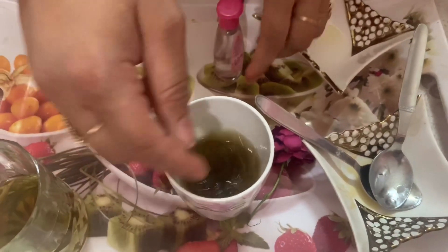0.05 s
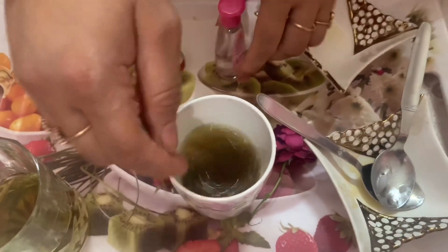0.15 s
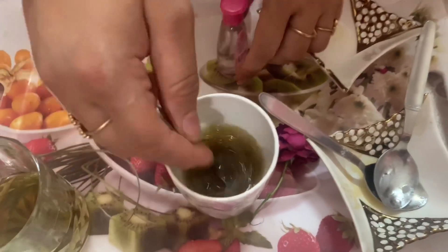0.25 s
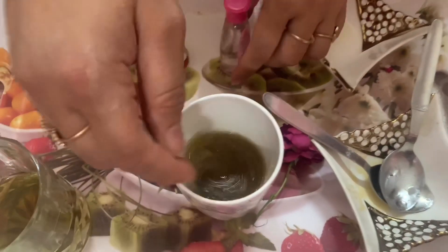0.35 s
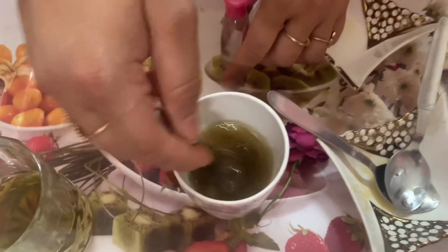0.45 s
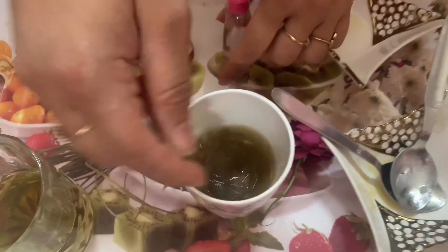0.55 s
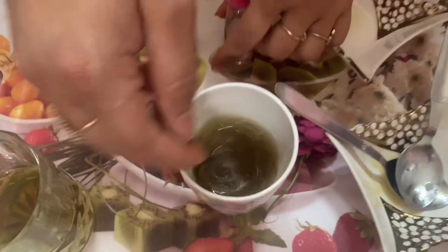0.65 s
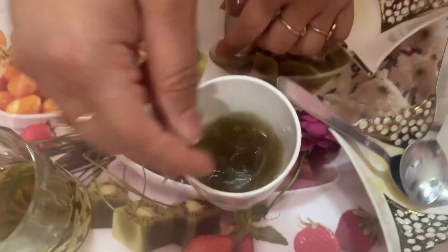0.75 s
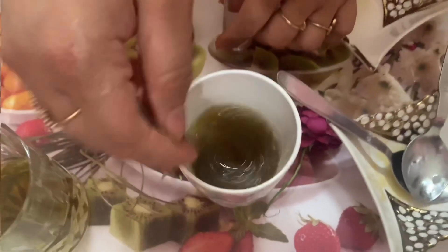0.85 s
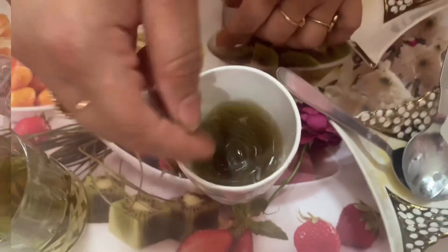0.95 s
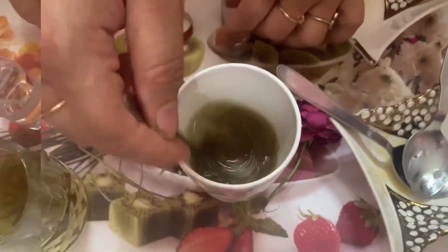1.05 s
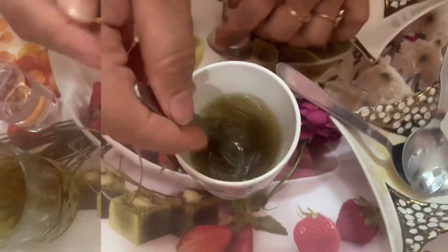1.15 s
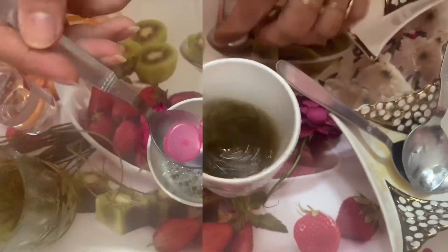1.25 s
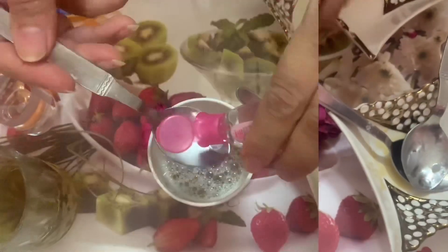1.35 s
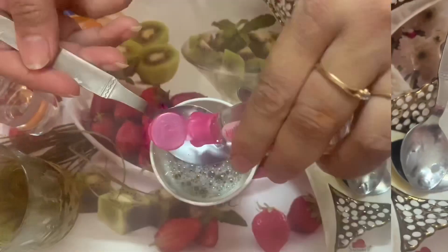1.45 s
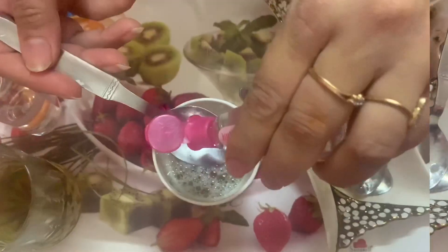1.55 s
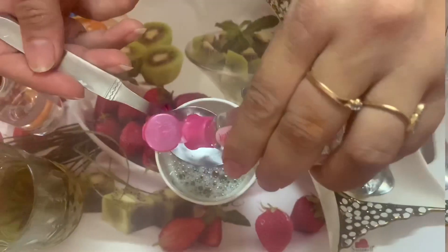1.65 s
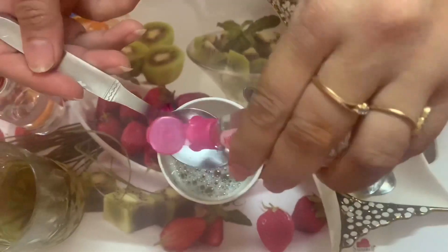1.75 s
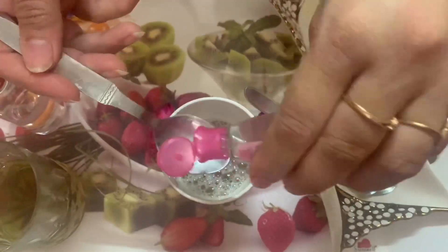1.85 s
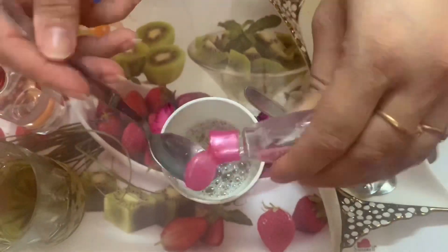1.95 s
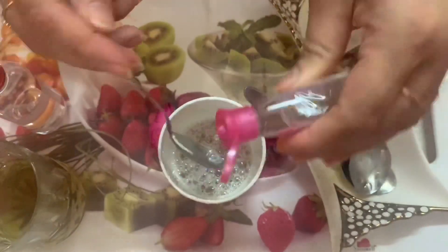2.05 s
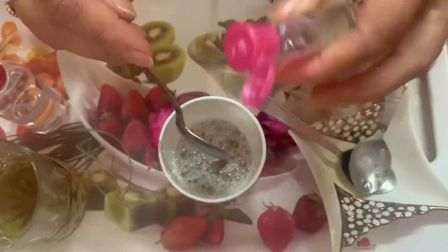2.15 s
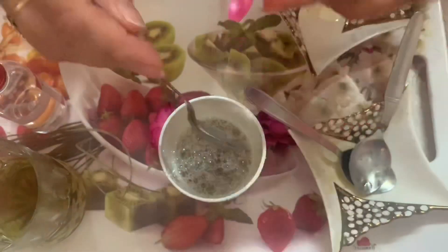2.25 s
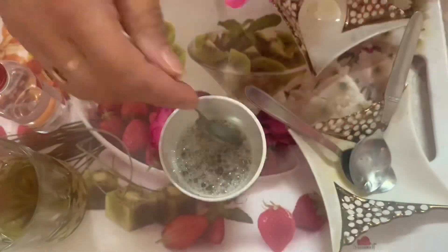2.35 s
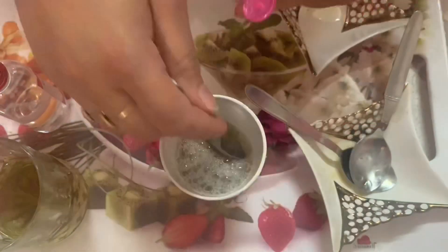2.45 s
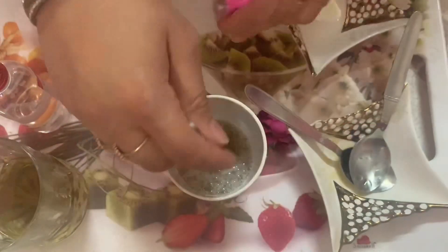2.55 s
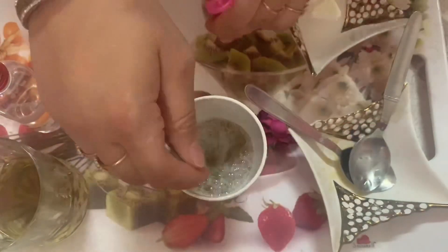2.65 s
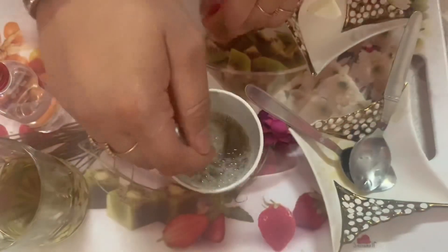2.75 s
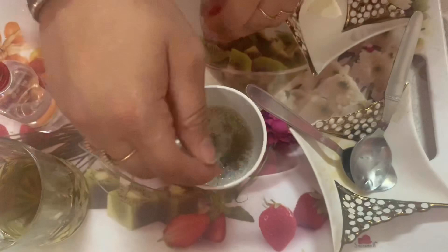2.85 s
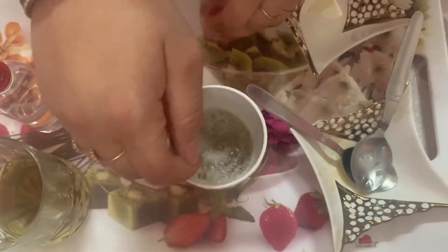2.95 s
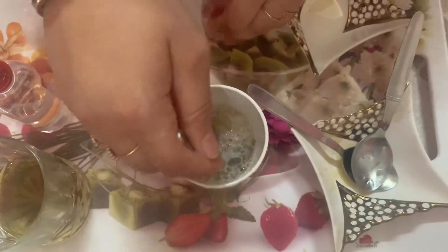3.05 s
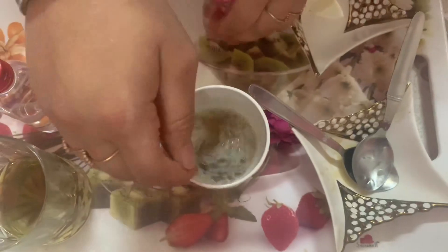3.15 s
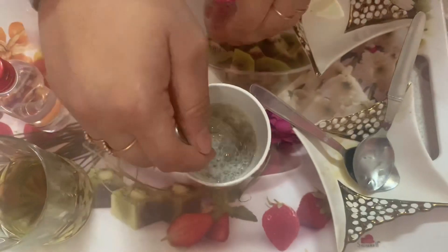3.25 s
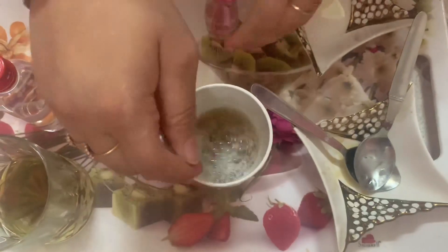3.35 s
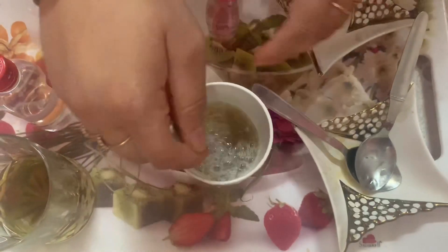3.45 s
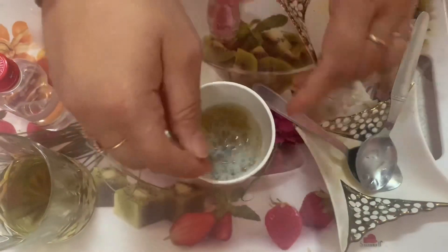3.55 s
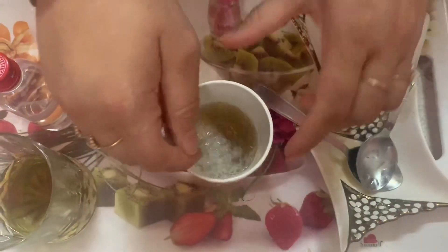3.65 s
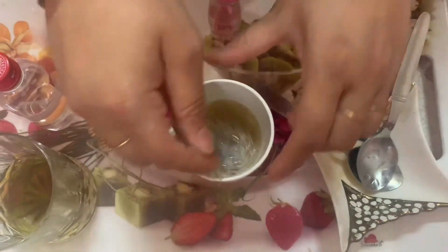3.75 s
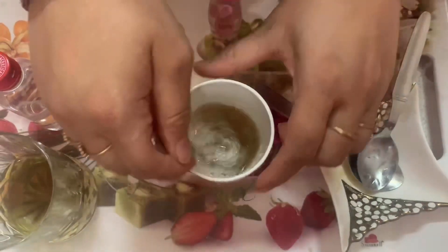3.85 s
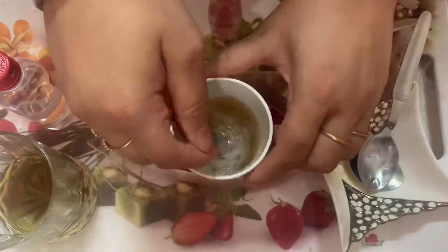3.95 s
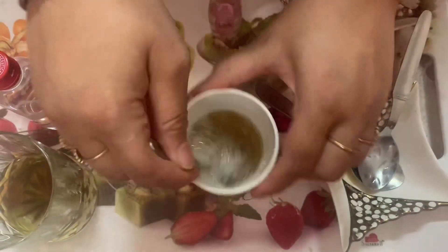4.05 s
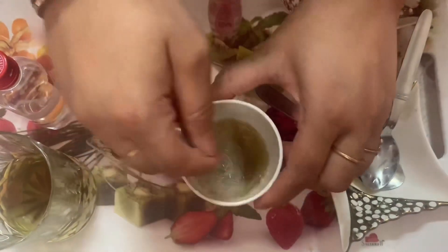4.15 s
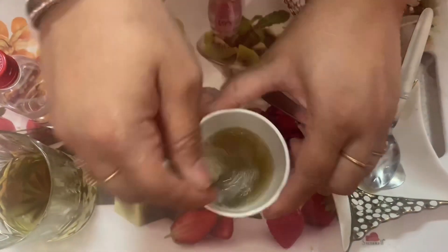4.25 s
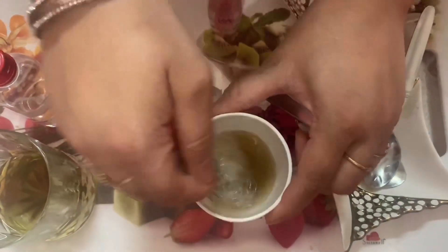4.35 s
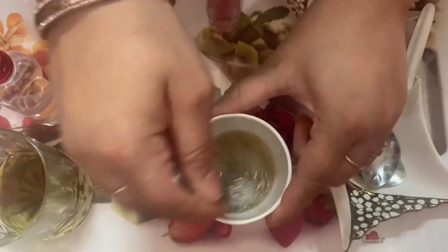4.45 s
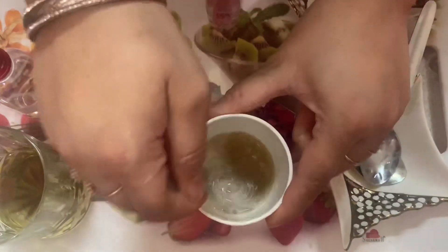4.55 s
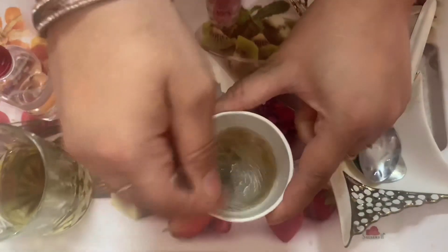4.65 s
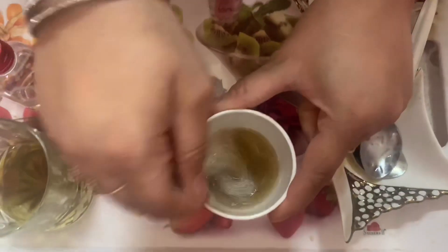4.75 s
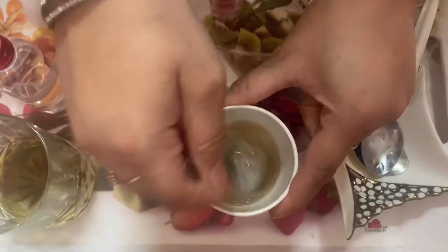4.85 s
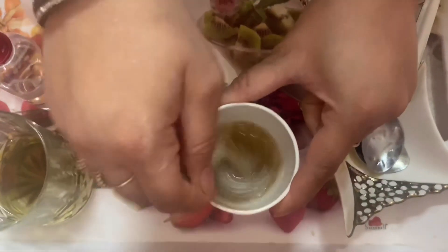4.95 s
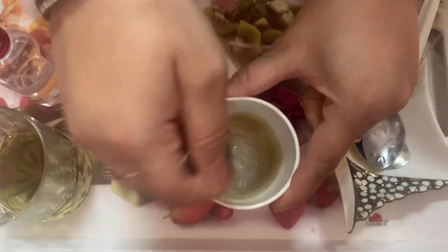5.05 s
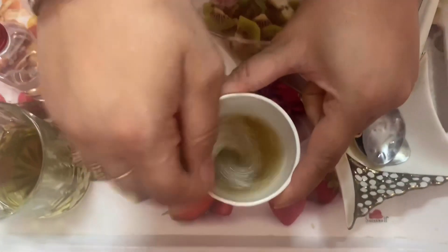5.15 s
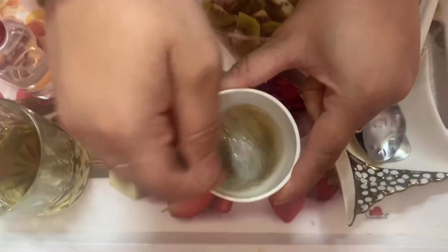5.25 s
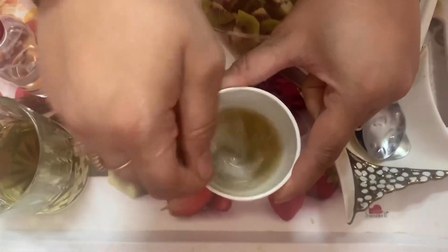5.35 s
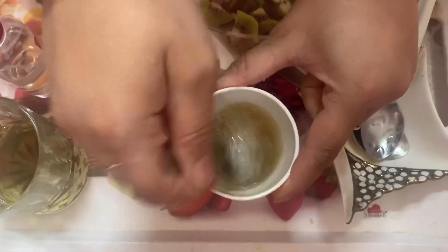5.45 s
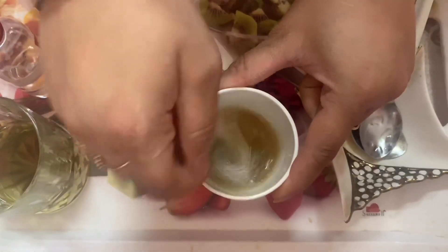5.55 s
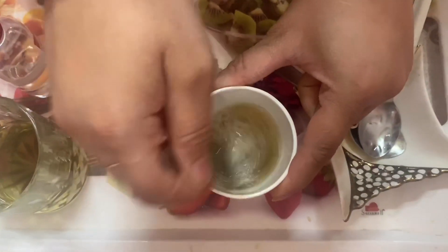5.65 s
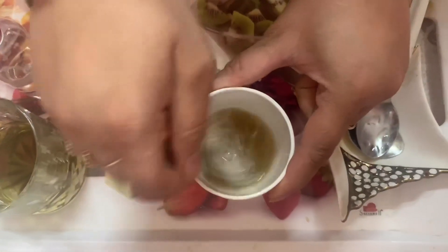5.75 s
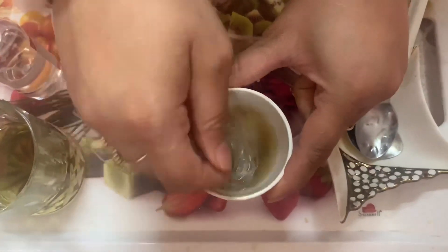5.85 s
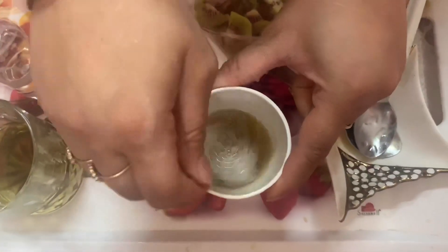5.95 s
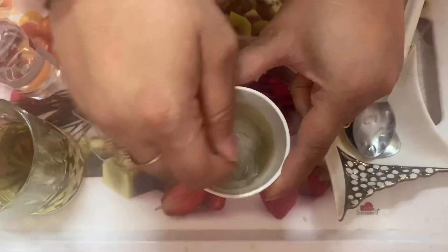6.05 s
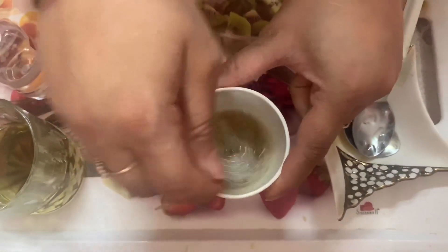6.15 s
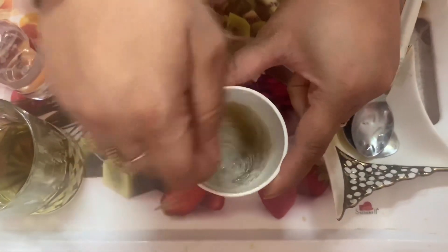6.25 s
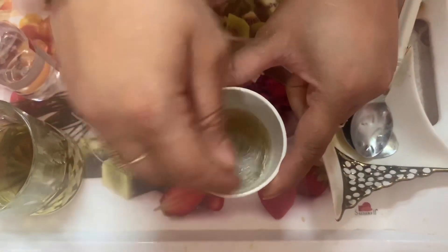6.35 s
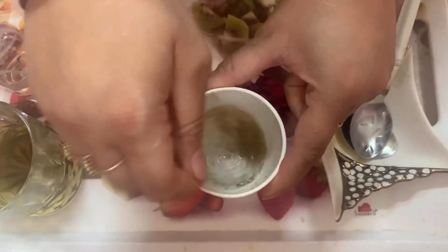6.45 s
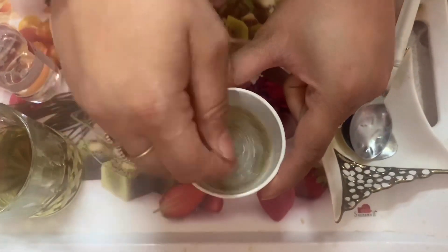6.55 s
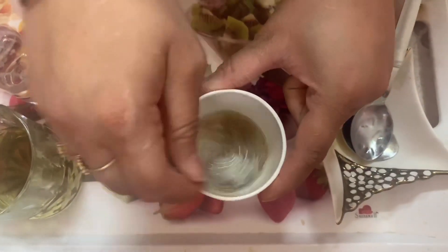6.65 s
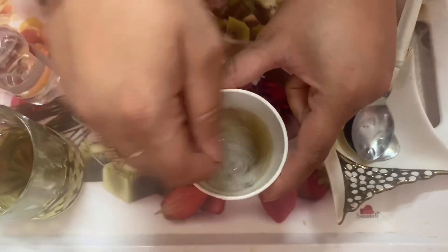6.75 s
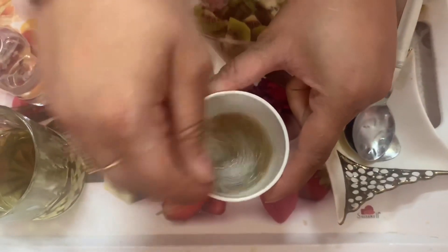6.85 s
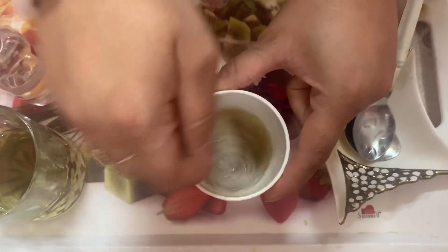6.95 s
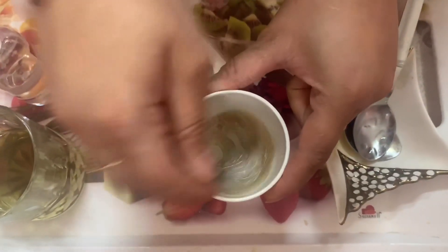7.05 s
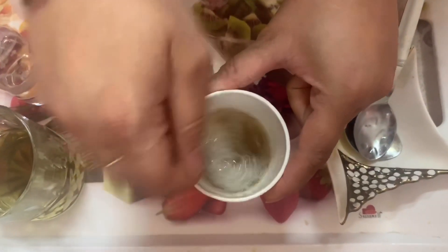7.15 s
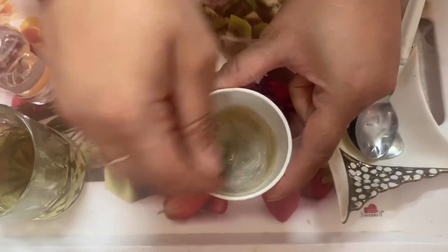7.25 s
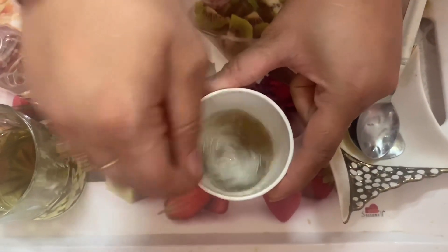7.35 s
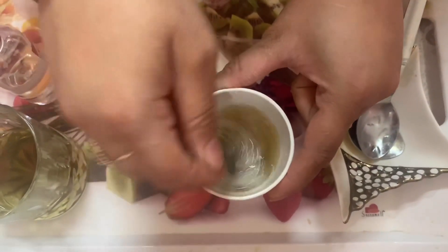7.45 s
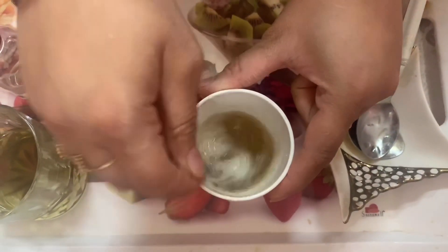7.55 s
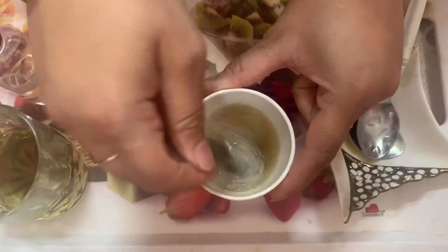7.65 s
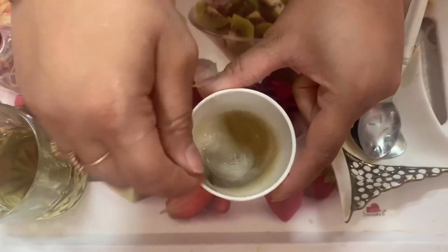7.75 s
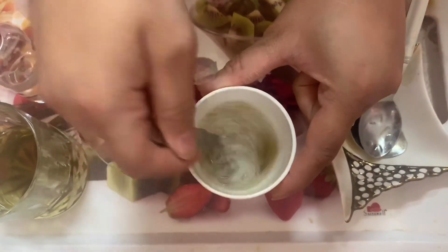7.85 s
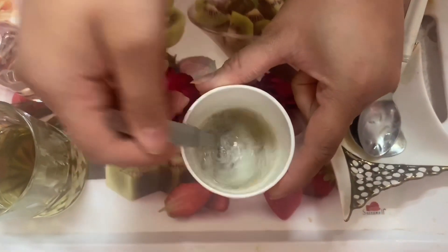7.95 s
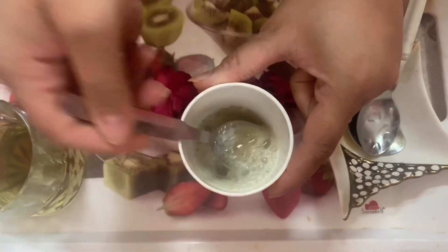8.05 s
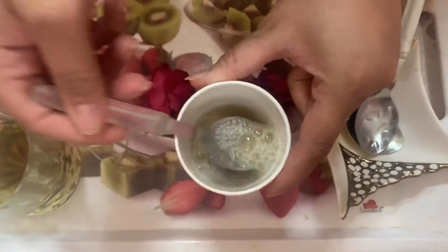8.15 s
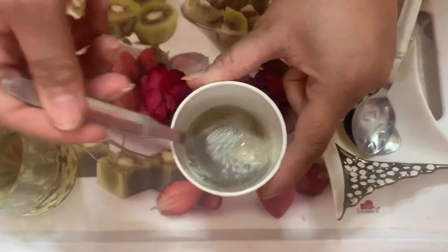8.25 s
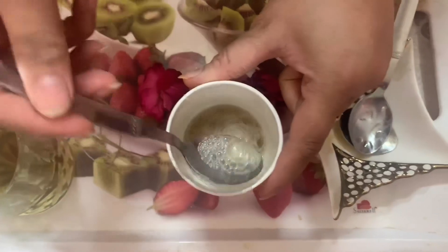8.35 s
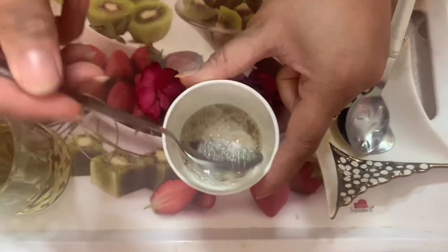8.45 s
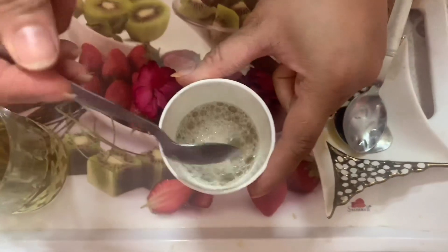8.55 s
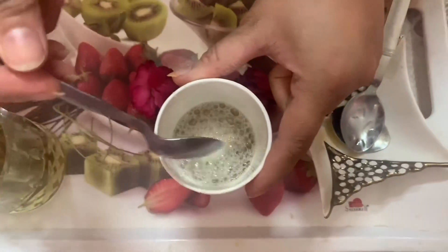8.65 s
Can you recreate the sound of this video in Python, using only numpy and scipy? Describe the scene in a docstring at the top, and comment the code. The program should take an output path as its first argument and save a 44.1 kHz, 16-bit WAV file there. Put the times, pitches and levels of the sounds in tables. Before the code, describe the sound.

A spoon rattles quickly around a small cup of liquid, ticking against ceramic with hollow knocks, tiny bubbly chirps and gritty scrapes. It stops for under a second, then starts again, first ringing, then drier and more clattery because the cup is held. Low thuds come from the tray beneath. Very close pickup, small quiet indoor room with short reflections.

```python
"""A metal spoon stirs liquid briskly in a small ceramic cup on a tray, close to a pair of microphones.
Each contact is a noisy tick and clack, a falling knock of the air in the cup and a burst of ringing modes.
In between, random jolts through warbling resonances scrape; short gliding sines are bubbles and spoon judder.
The tray thuds and booms under the cup. The stirring pauses and goes on; then a hand steadies the cup
and damps its ring. Near, early and diffuse reflections and a quiet room surround it all."""
import sys
import numpy as np
from scipy import signal
from scipy.fft import rfft, irfft, next_fast_len
from scipy.io import wavfile
from scipy.ndimage import uniform_filter1d

SR = 44100
rng = np.random.default_rng(int(sys.argv[2]) if len(sys.argv) > 2 else 0)


def inscribe(sig):
    """Save sig as 16-bit PCM at rate SR to the path in sys.argv[1].

    A 1-D sig is mono; a 2-D sig holds one channel per row.
    Samples are clipped to [-1, 1] before scaling.
    """
    pcm = np.round(np.clip(np.atleast_2d(sig).T, -1, 1) * 32767)
    wavfile.write(sys.argv[1], SR, pcm.astype(np.int16))


N = 383669

# Levels in the tables are settings relative to the layer's trim in the function that plays them.
# spoon meets cup, about twice a turn, at times in a quick cluster:
# [t/s, nominal cup air f/Hz, air knock level/dB, clack f/Hz, wall clack level/dB, metal tick level/dB]
CONTACTS = [(0.0312, 1280, -24.5, 2730, -20.5, -28.5), (0.0847, 1590, -43, 3025, -22, -24),
            (0.1837, 1337, -14.5, 2200, -25, -15), (0.272, 1500, -26.5, 2410, -30, -35.5),
            (0.3102, 1310, -24.5, 3260, -22.5, -22), (0.3255, 1320, -32, 2590, -21.5, -25),
            (0.4205, 1410, -21.5, 2880, -28.5, -16.5), (0.43, 1730, -31.5, 2896, -17, -29),
            (0.51, 1385, -22, 3140, -21, -30.5), (0.556, 1550, -32, 2500, -20, -22.5),
            (0.612, 1430, -28.5, 3060, -29, -46), (0.657, 1374, -11, 2180, -36.5, -18.5),
            (0.7385, 1364, -25, 2950, -21.5, -35), (0.7805, 1330, -20, 3130, -13, -16),
            (0.8803, 1340, -18.5, 3370, -26.5, -26), (0.8941, 1620, -24.5, 3060, -19.5, -21),
            (1.0091, 1337, -19, 2615, -16, -16), (1.1093, 1330, -23.5, 2070, -21, -21),
            (1.2308, 1730, -27.5, 2580, -20.5, -18), (1.285, 1750, -42, 2900, -35.5, -33),
            (1.334, 1140, -30, 3020, -26, -22.5), (1.351, 1320, -31, 2980, -22, -39),
            (1.3633, 1300, -28, 2560, -29, -31.5), (1.396, 1365, -31.5, 2590, -26, -44),
            (1.464, 1460, -56, 3060, -28.5, -36.5), (1.54, 1340, -52, 2720, -51, -34.5),
            (1.5726, 1516, -27, 3250, -31.5, -31.5), (1.6076, 1883, -25.5, 1880, -37.5, -31),
            (1.633, 1500, -44, 2980, -39, -33.5), (1.718, 1276, -40, 1880, -43, -35.5),
            (1.737, 1280, -34.5, 1920, -41, -42), (2.5092, 1720, -49, 3130, -41, -32),
            (2.654, 1430, -16.5, 3560, -15.5, -29.5), (2.8025, 1320, -18, 2520, -22, -19),
            (2.8232, 1570, -36.5, 3050, -22, -19.5), (2.834, 1690, -27, 2900, -20, -26),
            (2.896, 1210, -31.5, 2990, -28, -34), (2.9262, 1310, -21.5, 2900, -35, -27),
            (3.0539, 1360, -15, 3550, -25, -25), (3.0808, 1380, -26, 3070, -30.5, -26.5),
            (3.1727, 1270, -24.5, 2940, -15, -13.5), (3.268, 1270, -23.5, 3330, -26, -24.5),
            (3.303, 1200, -27.5, 3110, -34, -43.5), (3.409, 1360, -15, 2980, -12, -17.5),
            (3.428, 1330, -19.5, 3060, -24.5, -27.5), (3.44, 1430, -17.5, 3060, -41.5, -31.5),
            (3.4982, 1480, -18, 3600, -25, -23.5), (3.6332, 1500, -22, 3034, -13.5, -16),
            (3.752, 1220, -21.5, 2050, -29.5, -32), (3.8546, 1473, -16, 1960, -13, -18),
            (3.905, 1360, -28, 2030, -45, -55.5), (3.9561, 1267, -22.5, 3600, -22.5, -25.5),
            (3.98, 1220, -24.5, 2220, -38, -39), (4.062, 1280, -47, 3100, -33, -43),
            (4.0939, 1380, -23.5, 2600, -19, -20.5), (4.1786, 1233, -16.5, 3430, -29.5, -24),
            (4.218, 1326, -23.5, 4070, -43, -43), (4.2847, 1520, -36, 3230, -23, -35),
            (4.4, 1350, -32, 2910, -21.5, -26), (4.4146, 1370, -27.5, 1910, -45, -27.5),
            (4.506, 1420, -27.5, 2860, -46, -39.5), (4.546, 1190, -28.5, 3380, -26.5, -35.5),
            (4.643, 1355, -22, 3430, -17.5, -23), (4.762, 1360, -29.5, 3390, -20, -33),
            (4.7708, 1194, -26.5, 3420, -20, -23), (4.8554, 1460, -27.5, 3190, -24.5, -27.5),
            (4.8654, 1517, -16.5, 3320, -27, -26), (4.974, 1405, -21, 2100, -28.5, -33.5),
            (4.9814, 1225, -21.5, 3170, -20, -25), (5.0526, 1230, -15.5, 2130, -14.5, -23.5),
            (5.1005, 1540, -13, 2300, -28, -18.5), (5.1129, 1200, -17.5, 2100, -32.5, -29.5),
            (5.1913, 1460, -37, 1940, -21, -14.5), (5.265, 1630, -17.5, 2560, -16.5, -23.5),
            (5.2848, 1300, -11.5, 3100, -29, -27), (5.3865, 1200, -24.5, 3110, -15, -19),
            (5.403, 1330, -33, 3200, -15, -23), (5.4495, 1225, -13.5, 3920, -16, -23),
            (5.486, 1444, -15, 2600, -12.5, -17), (5.4959, 1430, -22, 3100, -25, -31),
            (5.5733, 1170, -22, 2280, -20, -15), (5.641, 1120, -12.5, 2210, -20, -25),
            (5.6685, 1250, -17, 2390, -16, -19.5), (5.6772, 1480, -17, 3000, -25, -26),
            (5.7607, 1250, -26, 2950, -16.5, -28), (5.7671, 1210, -20.5, 3060, -19, -20),
            (5.8644, 1350, -15.5, 3040, -15, -27), (5.87, 1294, -16.5, 3170, -36, -21.5),
            (5.939, 1320, -23, 1900, -17, -30.5), (5.964, 1374, -27, 2170, -26, -43.5),
            (6.062, 1380, -18, 3960, -21.5, -21.5), (6.078, 1163, -22.5, 3580, -27.5, -43),
            (6.12, 1355, -28.5, 2080, -33, -50), (6.1648, 1470, -33, 3180, -18.5, -30.5),
            (6.1958, 1325, -40, 2920, -28, -36), (6.235, 1335, -28.5, 3700, -31.5, -43),
            (6.301, 1370, -24.5, 4020, -23.5, -23.5), (6.345, 1400, -26, 2120, -34.5, -38),
            (6.4, 1196, -27.5, 2470, -30.5, -49), (6.4375, 1416, -22, 3180, -22, -28),
            (6.5, 1170, -39.5, 3570, -49, -54), (6.5425, 1366, -17.5, 3900, -30, -21),
            (6.563, 1200, -24.5, 2730, -60, -41.5), (6.6412, 1200, -18, 1940, -22.5, -29),
            (6.6805, 1400, -29.5, 3220, -25, -33), (6.719, 1280, -37, 3820, -37, -57),
            (6.7727, 1290, -25, 4080, -19.5, -23.5), (6.7973, 1360, -21, 1970, -25, -34),
            (6.8682, 1127, -24, 3120, -25.5, -26.5), (6.9076, 1160, -35, 3390, -25, -30),
            (6.9995, 1240, -25, 3970, -26.5, -28), (7.022, 1680, -28, 3120, -32, -35),
            (7.04, 1320, -23, 2700, -42, -39), (7.09, 1390, -18.5, 2260, -24, -30.5),
            (7.131, 1350, -27.5, 3170, -24.5, -41), (7.2084, 1610, -33.5, 2160, -34, -30.5),
            (7.2374, 1200, -15.5, 3240, -21, -27), (7.259, 1280, -25, 2660, -39, -36.5),
            (7.3075, 1333, -14, 2690, -21.5, -32.5), (7.4624, 1260, -21, 2620, -27.5, -28),
            (7.5282, 1390, -25, 2200, -23, -31), (7.5632, 1320, -32.5, 3930, -29.5, -31),
            (7.577, 1344, -27.5, 2600, -31, -54), (7.6726, 1550, -19.5, 2200, -23.5, -27),
            (7.6955, 1200, -23, 2080, -25, -29), (7.746, 1270, -35, 2550, -36.5, -43.5),
            (7.7771, 1144, -14.5, 3120, -18, -17.5), (7.8304, 1450, -33, 2160, -28, -28.5),
            (7.917, 1315, -14.5, 2655, -16.5, -22.5), (7.962, 1190, -29, 3200, -30.5, -37.5),
            (8.013, 1180, -34.5, 2880, -27.5, -35), (8.044, 1200, -28, 2900, -32.5, -51),
            (8.06, 1280, -30.5, 2220, -36, -71), (8.123, 1310, -50.5, 1950, -36, -79),
            (8.149, 1490, -53, 3440, -31, -57)]
# the cup rocks on the tray: [t/s, boom level/dB, boom settling f/Hz, thud level/dB]
THUMPS = [(1.289, -29, 522, -18.5), (2.842, -17.5, 279, -25), (2.972, -10.5, 293, -21.5),
          (3.175, -16.5, 291, -18), (3.412, -18, 308, -33), (3.635, -19.5, 275, -16),
          (3.857, -19.5, 318, -25), (3.961, -23.5, 219, -13), (4.121, -13.5, 308, -17),
          (4.404, -18.5, 287, -17), (4.65, -19, 260, -20), (4.868, -19.5, 253, -16.5),
          (5.054, -20, 238, -22), (5.265, -19, 242, -16.5), (5.452, -18, 250, -20.5),
          (5.64, -18, 258, -16.5), (6.077, -20, 430, -15.5), (6.176, -25.5, 272, -42),
          (6.347, -25, 252, -17.5), (6.797, -21.5, 277, -19), (7.214, -17, 290, -40),
          (7.237, -24, 264, -10), (7.433, -24, 292, -23.5), (7.465, -20.5, 255, -14),
          (7.65, -25.5, 297, -31.5), (7.673, -20, 262, -18.5), (7.843, -23.5, 285, -38.5)]
# short gliding notes from the liquid, and from the spoon juddering on the wall:
# [t/s, starting f/Hz, final f/Hz, length/s, level/dB]
GLIDING_NOTES = [(.07, 3070, 3210, 0.054, -17), (.2, 1610, 2000, 0.017, -10.5),
                 (.235, 1830, 1530, .03, -21.5), (.34, 2700, 2400, 0.035, -19),
                 (.462, 1500, 2130, 0.021, -21), (.575, 2970, 3060, 0.02, -17),
                 (.605, 3100, 3370, 0.018, -15), (.6, 1583, 1148, .028, -22),
                 (.663, 1321, 1200, .028, -11.5), (.693, 1730, 2130, 0.022, -24),
                 (.788, 2780, 3357, 0.018, -16), (.898, 1520, 1730, 0.033, -22),
                 (1.118, 1274, 1780, 0.05, -22), (1.875, 844, 1200, 0.037, -53.5),
                 (2.718, 1080, 1250, 0.022, -30), (2.84, 3080, 2900, 0.012, -12),
                 (4.32, 3100, 2770, 0.027, -23)]
# ringing of cup and spoon: [f/Hz, level/dB, t60/s with no grip]
MODES = [(1705.5, -1.5, 0.21), (2576, -1.5, 0.061), (3060, -12, 0.07), (3190, -6, 0.081), (3430, -17, 0.23),
         (4620, -1.5, 0.16), (6000, -20.5, 0.055), (7250, -18, 0.32), (7450, -18, 0.12),
         (8650, -15.5, 0.14), (10700, -15, 0.07), (15600, -24, .12)]
# how firmly the cup is held: [t/s, grip/0-1]
GRIP = [(0, 0.45), (3.5, 0.68), (3.95, 0.67), (4.6, 0.93), (8.3, 0.98)]
# colour of the wall's clack: [f/Hz, level/dB with the cup free, level/dB with it held]
CLACK_COLOUR = [(308, -29.5, -37.5), (870, -57, 1), (1730, -22, 13), (2000, -11.5, 4), (2410, -6.5, -1),
                (2900, 4, 5.5), (3060, 24, 2.5), (3500, 2.5, -2.5), (4070, -24, -7), (4490, 1.5, -4),
                (5600, -16, -18), (8020, -22.5, -61)]
# colour of the metal's tick: [f/Hz, level/dB with the cup free, level/dB with it held]
TICK_COLOUR = [(2000, -17.5, -16), (4380, 11, 11), (5140, -2, 7.5), (7440, 8.5, 7), (7400, -2, 8),
               (8900, -0.5, 10), (10500, -13.5, -1), (10480, 23, -6), (12460, -18, 3), (13800, -20.5, -3),
               (15600, -17, -8.5), (16500, -37.5, -35)]
# colour of the tray's thud: [f/Hz, level/dB]
TRAY_COLOUR = [(30, -26), (80, -6.5), (160, 2), (215, 0), (285, 3), (370, -22.5), (460, -2), (540, -5),
               (700, 1), (1000, -25), (2500, -62.5)]
# the tray is nudged, a low rumble: [t/s, level/dB]
NUDGE = [(1.2, -56.5), (1.27, -50.5), (1.31, -46), (1.35, -36), (1.44, -50), (1.52, -62)]
# colour of that rumble: [f/Hz, level/dB]
NUDGE_COLOUR = [(20, -23.5), (45, 2), (90, -3.5), (200, -10), (700, -20), (1100, -27), (3000, -35)]
# colour of the quiet room: [f/Hz, relative level/dB per Hz]
ROOM_NOISE_COLOUR = [(15, -46), (25, -0.5), (50, -9.5), (72, -4.5), (260, -12), (520, -29.5), (3430, -38),
                     (4610, -47), (6380, -45.5), (16000, -51.5)]
# phase of left against right in the low range, before the microphones move: [f/Hz, phase/rad]
PHASE_FIRST = [(0, 0), (700, -.15), (900, -.75), (1890, -.45), (3450, -3.1), (5150, -3.2), (6370, -.3)]
# the same after they move: [f/Hz, phase/rad]
PHASE_SECOND = [(0, 0), (480, -.9), (750, -5.1), (1000, -5.2), (1330, -6.05), (1900, -6), (2700, -4.8),
                (3880, -4.5)]
# phase of left against right in the treble, throughout: [f/Hz, phase/rad]
PHASE_TREBLE = [(7450, .5), (8400, 2.6), (9560, 3.6), (10450, 5.8), (11550, 6.5), (12600, 9), (13700, 9.7),
                (14600, 12.3)]
# left against right: [f/Hz, level difference/dB]
BALANCE = [(100, 0), (250, -3), (450, -2.5), (680, -6), (1000, .4), (1400, .7), (2400, -.5), (4400, 0)]
# decay time of the reflections: [f/Hz, t60/s]
ROOM_T60 = [(150, 0.84), (1300, 0.16), (3500, 0.29), (8000, 0.26), (15000, 0.13)]
# how briskly the spoon is driven round: [t/s, level/dB]
EFFORT = [(0, -25.5), (.6, -25.5), (1.15, -27), (1.4, -28.5), (1.75, -42), (1.83, -76), (2.48, -76),
          (2.52, -30), (2.82, -22.5), (3.5, -28), (4.3, -21), (5.3, -29), (6.2, -23.5), (7.3, -24.5),
          (7.95, -25), (8.17, -25.5), (8.25, -60.5)]
# the spoon springs clear of the wall and both ring on: [t/s, cup level/dB, spoon level/dB]
FREE_RINGS = [(0.189, -28, -34), (.423, -16, -34), (0.658, -19.5, -24), (0.882, -25.5, -27),
              (1.01, -30.5, -26), (1.114, -28, -32.5), (1.233, -43.5, -21), (1.608, -22.5, -49),
              (2.512, -34, -22), (2.654, -33.5, -26), (2.804, -15.5, -15), (3.068, -34, -21),
              (3.174, -30, -18), (3.414, -9, -30.5)]
# the spoon's edge judders along the wall: [t/s, length/s, level/dB]
RUBS = [(0.415, 0.012, -30), (0.533, 0.058, -28), (0.647, 0.018, -27.5), (0.789, 0.015, -29.5),
        (0.997, 0.02, -32), (1.336, 0.065, -33), (2.645, 0.005, -35), (2.831, 0.012, -37),
        (4.043, 0.052, -34), (4.289, 0.062, -34), (4.478, 0.099, -34.5), (5.394, 0.026, -34),
        (5.496, 0.043, -30.5), (5.711, 0.044, -29.5), (6.189, 0.019, -26), (6.422, 0.025, -33),
        (6.628, 0.025, -32), (7.323, 0.067, -41.5), (7.507, 0.044, -31.5), (7.907, 0.0069, -29.5),
        (8.166, 0.034, -42)]
# resonances of the filled cup, which the sloshing liquid keeps retuning:
# [f/Hz, width/Hz with the cup free, swing/share of pitch, level/dB free, level/dB held]
WARBLES = [(1280, 70, .08, -1.5, 3), (1730, 50, .03, -1.5, -7), (2600, 69, .06, -3, -11),
           (3100, 78, .04, -3, -11), (3596, 80, 0.073, -23.5, -9.5), (4644, 45, .004, -5.5, -23)]

MOVE_S = 2.2  # the microphones move
ATTACK = 265  # samples over which a blow's level counts
USUAL_HIT_DB = -12  # harder hits give louder slides and heavier thumps
TAP_LOW_HZ, TAP_HIGH_HZ = 1200, 1359  # nominal air pitch of light touches


def amp(db):
    """Decibels to gain."""
    return 10 ** (np.asarray(db) / 20)


def unit(x, count=None):
    """Scales to rms 1 over the first count samples."""
    return x / np.sqrt(np.mean(x[:count] ** 2) + 1e-20)


def read(points, hz):
    """A spectrum's value on a log-frequency axis."""
    f, value = np.transpose(points)
    return np.interp(np.log(hz + 1), np.log(f + 1), value)


def curve(rows, t):
    """A control's value at the times t."""
    return np.interp(t, *np.transpose(rows))


def held(t):
    """How firmly the hand grips the cup at the times t, from 0 to 1."""
    return np.clip(curve(GRIP, t), 0, 1)


def add(mix, s, sound):
    """Mixes a sound in at second s."""
    part = mix[max(0, round(s * SR)):][:len(sound)]
    part += sound[:len(part)]


def response(points, size=512):
    """Causal, minimum-phase impulse response with the given colour."""
    log_gain = np.log(amp(read(points, abs(np.fft.fftfreq(4 * size, 1 / SR)))))
    return np.fft.ifft(np.exp(np.conj(signal.hilbert(log_gain)))).real[:size]


def convolve(x, h):
    """Filters x and keeps its length."""
    return signal.oaconvolve(x, h)[:len(x)]


def colour(table, grip, spot_db=0):
    """Blends the free and the held colour; the spot that is struck favours some resonances."""
    hz, free, gripped = np.transpose(table)
    spot = spot_db * rng.uniform(-1.4, 1, len(hz))
    return response(np.transpose([hz, free + grip * (gripped - free) + spot]))


def noise(points):
    """Steady noise of the given colour, rms 1."""
    size = next_fast_len(N)
    spectrum = rfft(rng.standard_normal(size)) * amp(read(points, np.fft.rfftfreq(size, 1 / SR)))
    return unit(irfft(spectrum, size)[:N])


def stirring(t, rise_s=0.0038, start_db=3.5, free_fade=263.5, held_fade=91, follows=0.55, swirl_db=-12.5):
    """The slide as a gain: it bites after each contact and fades (dB/s), more slowly in a held cup."""
    times, _, knock, _, clack, tick = np.transpose(CONTACTS)
    loudest = np.max([knock, clack, tick], axis=0)
    last = np.maximum(np.searchsorted(times, t) - 1, 0)
    since = abs(t - times[last])
    fade = np.interp(held(t), [0, 1], [free_fade, held_fade])
    bite_db = start_db * np.maximum(1 - since / rise_s, 0)
    slide_db = follows * (loudest[last] - USUAL_HIT_DB) + bite_db - fade * since
    # the liquid keeps turning between contacts
    return amp(curve(EFFORT, t) + np.maximum(slide_db, swirl_db))


def slips(per_s, spread_db):
    """Sparse tiny jolts of very unequal size."""
    size = amp(spread_db * np.minimum(rng.exponential(1, N), 3))
    return size * np.sign(rng.random(N) - .5) * (rng.random(N) < per_s / SR)


def resonate(x, hz, width):
    """A resonance that follows the pitch curve hz: shift down, two equal poles, shift back; rms 1."""
    turn = np.exp(2j * np.pi * np.cumsum(hz) / SR)
    r = np.exp(-np.pi * width / SR)
    return unit((turn * signal.lfilter([1], np.poly([r, r]), x / turn + 1e-18)).real)


def scrape(wall_db=-11, metal_db=-14, free_db=-2, held_wider=3.5):
    """The sliding spoon jolts the cup, whose resonances warble as the liquid swirls; grit comes with it."""
    t, out = np.arange(N) / SR, np.zeros(N)
    grip, jolts = held(t), slips(per_s=220, spread_db=5.5)
    swirl = noise([(4, 0), (18, 0), (40, -70)])  # slow random retuning
    for hz, width, swing, loose_db, held_db in WARBLES:
        pitch = hz * np.exp(swing * np.roll(swirl, rng.integers(N)))
        push = jolts * rng.standard_normal(N)
        out += (1 - grip) * amp(loose_db) * resonate(push, pitch, width)
        # fingers and froth broaden the resonances
        out += grip * amp(held_db) * resonate(push, pitch, held_wider * width)
    grit = convolve(abs(jolts), np.hanning(260)) * rng.standard_normal(N)
    for table, db in ((CLACK_COLOUR, wall_db), (TICK_COLOUR, metal_db)):
        loose = amp(free_db) * unit(convolve(grit, colour(table, 0)))
        gripped = unit(convolve(grit, colour(table, 1)))
        out += amp(db) * ((1 - grip) * loose + grip * gripped)
    return stirring(t) * out


def light_contacts(s, db):
    """Rows like those of CONTACTS, each at a random spot of the wall."""
    air_hz, clack_hz = rng.uniform([TAP_LOW_HZ, 2000], [TAP_HIGH_HZ, 3700], (len(s), 2)).T
    return np.column_stack([s, air_hz, db[:, 0], clack_hz, db[:, 1:]])


def taps(count=400, per_s=7, knock_db=1.5, clack_db=-5.5, tick_db=-12):
    """The sliding spoon skips against the wall at random, as loud as the slide allows."""
    when, chance = rng.random((count, 2)).T
    s = when * N / SR
    db = 20 * np.log10(stirring(s))[:, None] + [knock_db, clack_db, tick_db]
    return list(light_contacts(s, db)[chance < per_s * N / SR / count])


def rebounds(chance=.6, soonest_s=0.0049, latest_s=.014, knock_db=-14, clack_db=-12, tick_db=-16):
    """The spoon often bounces and touches again, more softly and at another spot."""
    s, _, knock, _, clack, tick = np.transpose(CONTACTS)
    happens, delay = rng.random((len(s), 2)).T
    db = np.column_stack([knock + knock_db, clack + clack_db, tick + tick_db])
    return list(light_contacts(s + soonest_s + delay * (latest_s - soonest_s), db)[happens < chance])


def air(hz, turn, swell_s=0.002, sag=0.68, sag_s=0.00081):
    """The air above the liquid swells for a few cycles and dies, its pitch falling from a high start."""
    t = np.arange(900) / SR
    pitch = hz * (0.9132 + sag * np.exp(-t / sag_s))
    swell = (t / swell_s) ** 2 * np.exp(-t / swell_s)
    return unit(swell * np.sin(2 * np.pi * (np.cumsum(pitch) / SR + turn)), count=ATTACK)


def chatter(decay_s, bounce_db=-14, per_s=260, rise_share=0.28, bounce_s=.007):
    """One contact: a short gritty crush, then a few small rebounds."""
    t = np.arange(2200) / SR
    grit, size = rng.standard_normal((2, len(t)))
    touches = (rng.random(len(t)) < per_s / SR) * size * amp(bounce_db) * np.exp(-t / bounce_s)
    touches[0] = 1  # the first touch
    crush = np.exp(-t / decay_s) * (1 - np.exp(-t / (rise_share * decay_s)))
    return grit * convolve(touches, crush)


def swell_in(sound, lead_db=-19, lead_s=0.0016):
    """The noise of the strike swells in softly over a millisecond or two."""
    t = np.arange(-ATTACK, 0) / SR
    lead = unit(np.resize(sound[:ATTACK // 2], ATTACK))
    return np.r_[amp(lead_db) * np.exp(t / lead_s) * lead, sound]


def clack_tone(hz, grip, free_s=0.0091, held_s=0.0032, rise_s=0.0012):
    """The struck spot picks one short note out of the clack; it bends as the spoon dips or rises."""
    t = np.arange(2200) / SR
    bend_per_s = 2.5 * rng.uniform(-1, 1)
    swell = (1 - np.exp(-t / rise_s)) * np.exp(-t / (free_s + grip * (held_s - free_s)))
    turns = np.cumsum(hz * (1 + bend_per_s * t)) / SR + rng.random()
    return unit(swell * np.sin(2 * np.pi * turns), count=ATTACK)


def spoon_tones(low_hz, high_hz, t60, count=3):
    """A few spoon partials, retuned at each contact by where it presses and how deep it dips."""
    t = np.arange(5000) / SR
    hz, turn = rng.uniform(low_hz, high_hz, (count, 1)), rng.random((count, 1))
    return np.sin(2 * np.pi * (hz * t + turn)).sum(0) * amp(-60 * t / t60) / np.sqrt(count)


def ring(drive, grip, grip_db=-12, damping=1.5, waver=.008, flare_db=4, slowest_hz=9, fastest_hz=32):
    """Cup and spoon modes under a drive of (Hz, dB): fingers mute them, lapping liquid wavers and flares."""
    t = np.arange(0, .2 / (1 + grip), 1 / SR)
    hz, db, t60 = np.transpose(MODES)[:, :, None]
    db = db + read(drive, hz) + grip * grip_db + 2 * rng.standard_normal(hz.shape)
    lap = np.sin(2 * np.pi * (rng.uniform(slowest_hz, fastest_hz, hz.shape) * t + rng.random(hz.shape)))
    fade_db = 60 * t * (1 + damping * grip) / t60
    turns = np.cumsum(hz * (1 + waver * lap), axis=1) / SR + rng.random(hz.shape)
    return (amp(db - fade_db + flare_db * lap) * np.sin(2 * np.pi * turns)).sum(0)


def touched(sound, s, mute_db=-6):
    """A ring that starts at second s is damped by every later contact."""
    times = np.array(CONTACTS)[:, 0]
    later = times[times > s + .01] - s
    touches = np.searchsorted(later, np.arange(len(sound)) / SR)
    return sound * uniform_filter1d(amp(mute_db * touches), size=90)


def contacts(air_db=1.99, body_db=-17, clack_db=-2.0, note_db=-5.0, tick_db=1.0, tones_db=-6,
             air_lag_s=0.00038, free_s=0.0017, held_s=0.0031, tick_share=0.63, glance=0.25,
             spot_db=3.5, free_t60=.075, held_t60=.02):
    """Every contact sounds the air in the cup, the wall with its own note, the spoon and the modes."""
    out = np.zeros(N)
    for s, hz, knock, clack_hz, clack, tick in list(CONTACTS) + taps() + rebounds():
        grip = held(s)
        # a hard hit is over at once, a glancing one drags
        crush_s = (free_s + grip * (held_s - free_s)) * amp(-glance * (tick + 29.0))
        swell_s = 0.0011 * rng.uniform(.75, 1.3)
        add(out, s + air_lag_s, amp(knock + air_db) * air(hz, rng.random(), swell_s=swell_s))
        # the held cup adds a duller knock below
        add(out, s, grip * amp(knock + body_db) * air(rng.uniform(600, 880), rng.random()))
        wall = unit(convolve(chatter(crush_s), colour(CLACK_COLOUR, grip, spot_db)), count=ATTACK)
        metal_grit = chatter(crush_s * tick_share)
        metal = unit(convolve(metal_grit, colour(TICK_COLOUR, grip, spot_db)), count=ATTACK)
        strike = amp(clack + clack_db) * swell_in(wall) + amp(tick + tick_db) * swell_in(metal)
        add(out, s - ATTACK / SR, strike)
        add(out, s, amp(clack + note_db) * clack_tone(clack_hz, grip))
        t60 = free_t60 + grip * (held_t60 - free_t60)
        add(out, s, amp(tick + tones_db) * spoon_tones(6000, 11600, t60))
        drive = [(1700, max(knock - 8, clack) - 3), (2500, clack), (4600, clack), (6500, tick)]
        add(out, s, touched(ring(drive, grip), s))
    return out


def tray(thump_db=-11, heavier=0.57, free_db=-28, held_db=-24, rattle=0.13, rattle_s=0.017,
         boom_db=2, boom_hz=285, boom_s=0.01, rise_s=0.0025, sag=0.15, sag_s=0.0042):
    """The tray thuds and booms when the cup rocks, and faintly under contacts, more so in a held cup."""
    out, thud, t = np.zeros(N), response(TRAY_COLOUR, size=2048), np.arange(4000) / SR
    blows = []
    for s, db, hz, thud_db in THUMPS:
        blows.append((s, db + thump_db + heavier * (db - USUAL_HIT_DB), hz, thud_db - db))
    for s, _, knock, _, clack, tick in CONTACTS:
        db = max(knock, clack, tick) + np.interp(held(s), [0, 1], [free_db, held_db])
        blows.append((s, db, boom_hz * rng.uniform(0.77, 1.53), 0))
    for s, db, hz, thud_db in blows:
        push = (t == 0) + rattle * rng.standard_normal(len(t)) * np.exp(-t / rattle_s)
        turns = np.cumsum(hz * (1 + sag * np.exp(-t / sag_s))) / SR + rng.random()
        boom = np.exp(-t / boom_s) * np.minimum(t / rise_s, 1) ** 2 * np.cos(2 * np.pi * turns)
        knock = amp(thud_db) * unit(convolve(push, thud), count=660)
        add(out, s, amp(db) * (knock + amp(boom_db) * unit(boom, count=660)))
    return out


def gliding_notes(count=520, whipped_db=-4, spread_db=8, small_db=-6, low_hz=1100, high_hz=3300,
                  glide=1.1, short_s=.007, long_s=.015, slosh_db=-10, slosh_s=0.024):
    """Gliding sines: the listed notes, small whipped-in bubbles, and sloshes that bend the cup's note."""
    out, rows = np.zeros(N), list(GLIDING_NOTES)
    when, size, life, strength = rng.random((count, 4)).T
    s, hz = when * N / SR, low_hz * (high_hz / low_hz) ** size
    db = 20 * np.log10(stirring(s)) + whipped_db + spread_db * strength + small_db * size
    rows += list(zip(s, hz, hz * glide ** life, short_s + long_s * life ** 2, db))
    # each contact sets off a slosh
    for s, hz, knock, *_ in CONTACTS:
        rows.append((s + ATTACK / SR, hz, hz * glide ** rng.uniform(-2, 1), slosh_s, knock + slosh_db))
    for s, start_hz, end_hz, length, db in rows:
        u = np.arange(0, 1, 1 / (length * SR))  # share of the note's life
        turns = np.cumsum(start_hz + (end_hz - start_hz) * u) / SR
        swell = np.minimum(u / .12, 1) * (1 - u) ** 1.3
        add(out, s, amp(db) * swell * np.sin(2 * np.pi * turns))
    return out


def free_rings():
    """The cup's lowest mode and the spoon's bright ones ring with no grip until later contacts damp them."""
    out = np.zeros(N)
    for s, cup_db, spoon_db in FREE_RINGS:
        drive = [(1750, cup_db), (2500, spoon_db - 22.5), (4600, spoon_db - 14),
                 (7500, spoon_db), (11000, spoon_db + 1.0)]
        add(out, s, touched(ring(drive, 0), s))
    return out


def rubs(slips_per_s=150, uneven=0.4, slip_s=0.00045, air_db=-2, wall_db=-2, metal_db=-14, spot_db=4):
    """Pressed to the wall, the spoon sticks and slips in a quick, uneven run with its own colour."""
    out = np.zeros(N)
    for s, length, db in RUBS:
        t, grip = np.arange(round((length + .02) * SR)) / SR, held(s)
        at = np.cumsum(np.exp(uneven * rng.standard_normal(40))) / slips_per_s
        since = t[:, None] - (at - at[0])
        press = np.sqrt(np.maximum(np.sin(np.pi * np.minimum(t / length, 1)), 0))
        jerks = (since >= 0) * np.exp(-abs(since) / slip_s) @ rng.uniform(0.35, 1, len(at))
        grit = press * jerks * rng.standard_normal(len(t))
        bodies = [air(rng.uniform(TAP_LOW_HZ, TAP_HIGH_HZ), rng.random(), swell_s=0.00089),
                  colour(CLACK_COLOUR, grip, spot_db), colour(TICK_COLOUR, grip, spot_db)]
        for body, body_db in zip(bodies, (air_db, wall_db, metal_db)):
            add(out, s, amp(db + body_db) * unit(convolve(grit, body), count=round(length * SR)))
    return out


def nudge():
    """The nudged tray rumbles: low noise under a level curve."""
    return amp(curve(NUDGE, np.arange(N) / SR)) * noise(NUDGE_COLOUR)


def early(x, decay_s=0.0016):
    """Hands and tray throw a few milliseconds of reflections, drawn afresh at each call."""
    t = np.arange(400) / SR
    echoes = rng.standard_normal(len(t)) * t * np.exp(-t / decay_s)
    return convolve(x, echoes / np.linalg.norm(echoes))


def room(x):
    """Sparse reflections, each band dying at its own speed."""
    echoes = rng.standard_normal(SR // 2) * (rng.random(SR // 2) < 3000 / SR)
    echoes[:180] = 0  # nothing returns in the first 4 ms
    hz, t, z = signal.stft(echoes, SR, nperseg=256)
    tail = signal.istft(z * amp(-60 * t / read(ROOM_T60, hz)[:, None]), SR, nperseg=256)[1]
    return convolve(x, tail / np.linalg.norm(tail))


def microphones(x, phase):
    """Two microphones hear one sound with a difference in phase and level."""
    size = next_fast_len(N + 4096)
    hz = np.fft.rfftfreq(size, 1 / SR)
    # each side takes half of the difference
    half = amp(read(BALANCE, hz) / 2) * np.exp(.5j * np.interp(hz, *np.transpose(phase)))
    return irfft(rfft(x, size) * np.array([half, 1 / half]), size)[:, :N]


def room_noise(level_db=-59, side_db=-14):
    """The quiet room: one noise common to both sides and a fainter one in opposite polarity."""
    common, side = noise(ROOM_NOISE_COLOUR), noise(ROOM_NOISE_COLOUR)
    return amp(level_db) * (common + amp(side_db) * side * np.array([[1], [-1]]))


def scene(scrape_db=-6.5, near_db=-16, early_db=-13, diffuse_db=-22):
    """Cup and tray with their reflections, over a quiet room."""
    t = np.arange(N) / SR
    slide = amp(scrape_db) * scrape() + rubs()
    spoon = contacts() + free_rings() + slide
    dry = spoon + tray() + gliding_notes()
    # the moving hands keep changing the near reflections, once round per second
    sways = np.cos(2 * np.pi * t), np.sin(2 * np.pi * t)
    near = sum(room(dry * sway) for sway in sways)
    cup = dry + amp(near_db) * near + nudge()
    heard = microphones(cup * (t < MOVE_S), PHASE_FIRST + PHASE_TREBLE)
    heard += microphones(cup * (t >= MOVE_S), PHASE_SECOND + PHASE_TREBLE)
    hands = np.array([sum(early(spoon * sway) for sway in sways) for ear in range(2)])
    diffuse = np.array([room(dry), room(dry)])
    return heard + amp(early_db) * hands + amp(diffuse_db) * diffuse + room_noise()


def record(dry, edge_hz=16500):
    """The loudest peaks are rounded off; then the band limit."""
    limited = dry / (1 + dry ** 6) ** (1 / 6)
    lowpass = signal.firwin(255, edge_hz, window=("kaiser", 9), fs=SR)
    return signal.oaconvolve(limited, lowpass[None], "same")


dry = scene()
out = record(dry)
inscribe(out)
```